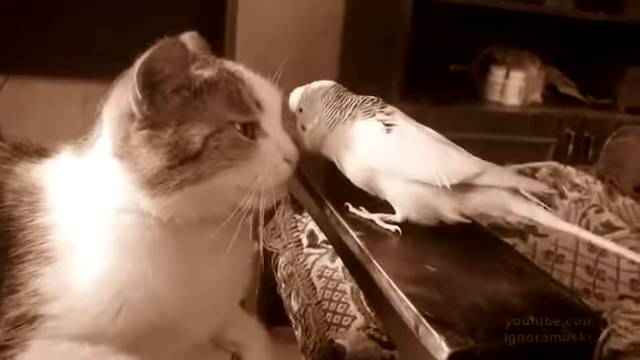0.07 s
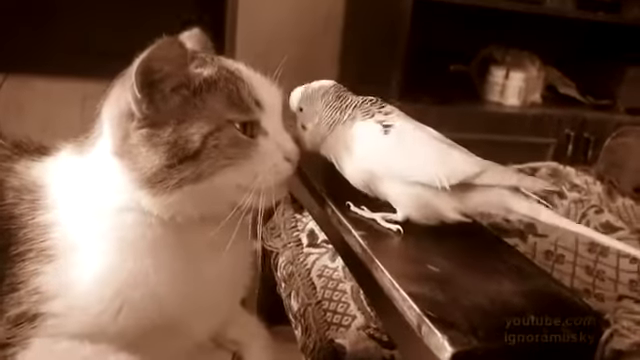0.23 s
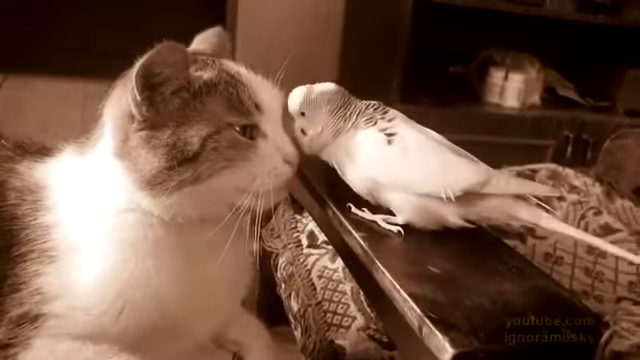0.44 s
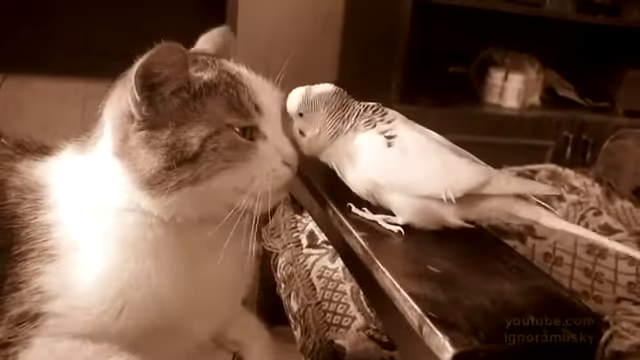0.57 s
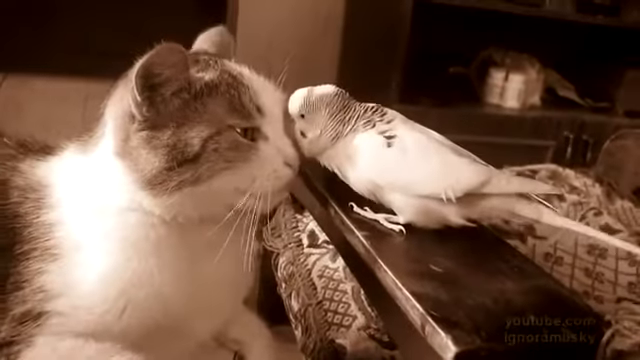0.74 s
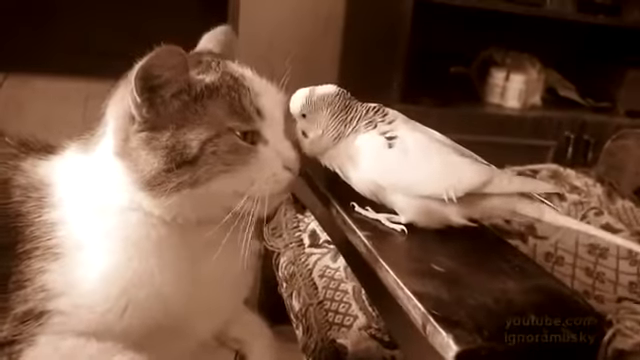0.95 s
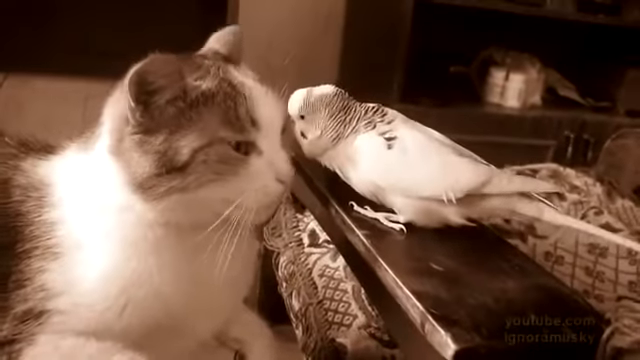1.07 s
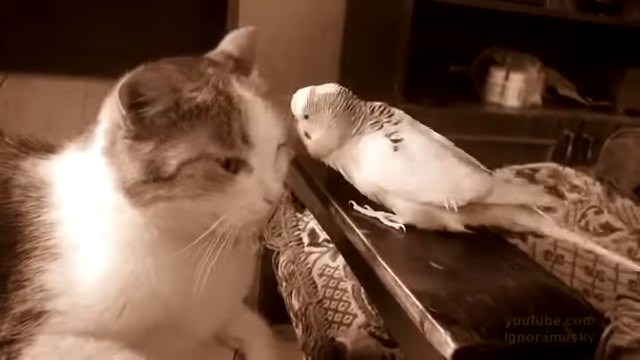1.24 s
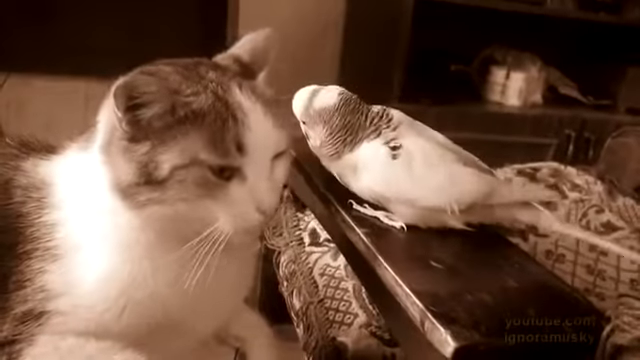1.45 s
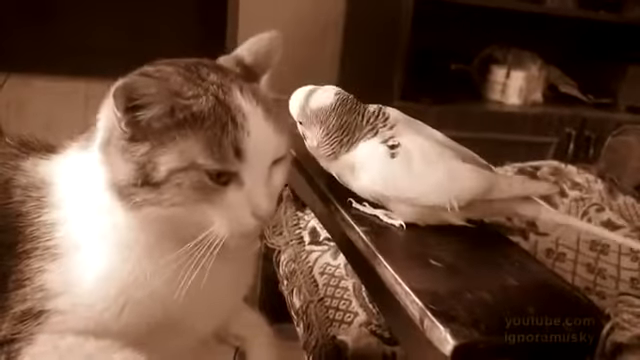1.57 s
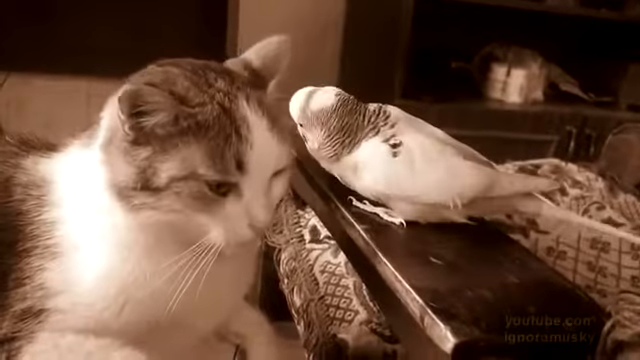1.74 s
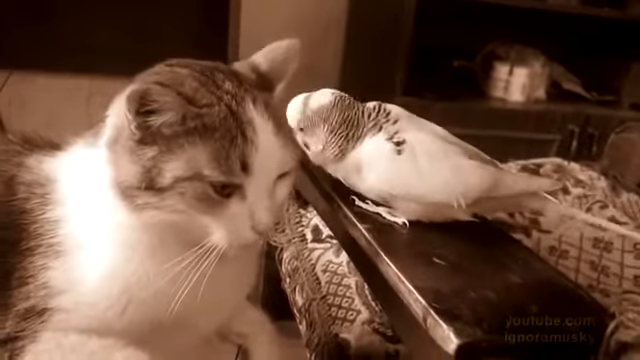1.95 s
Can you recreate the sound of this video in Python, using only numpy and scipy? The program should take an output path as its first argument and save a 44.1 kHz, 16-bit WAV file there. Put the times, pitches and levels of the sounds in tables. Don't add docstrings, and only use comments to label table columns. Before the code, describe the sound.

Small pet parakeet gives a rising two-part call, a rasping squawk, then fast clicking chatter

```python
import sys
import numpy as np
from scipy import signal
from scipy.fft import rfft, irfft, next_fast_len
from scipy.io import wavfile
from scipy.ndimage import uniform_filter1d

SR = 44100
rng = np.random.default_rng(int(sys.argv[2]) if len(sys.argv) > 2 else 0)


def int16_out(signal):
    q = np.round(np.clip(np.atleast_2d(signal).T, -1, 1) * 32767)
    wavfile.write(sys.argv[1], SR, q.astype(np.int16))


def boost(x):
    u = np.asarray(x, float) / 20
    return 10 ** u


N = 88200

# f/Hz, density/dB [per Hz]
AIR_SPECTRUM = [
    (13, -30),
    (24, -5),
    (70, -8.5),
    (264, -0.5),
    (685, -5),
    (976, -6),
    (3300, -10.5),
    (6800, -29.5),
    (15000, -42),
]
AIR_DB, AIR_FLICKER_DB, AIR_FLICKER_HZ = -41.5, 2, 8.9

# f/Hz, bandwidth/Hz, level/dB
HUM_BANDS = [
    (119.3, 3.8, -55),
    (172.8, 20, -58),
    (267.3, 20, -50.5),
    (394.7, 20, -55),
    (466.2, 61, -55),
    (1166.7, 30, -56.5),
    (2798, 61, -53),
]
# f/Hz, level/dB
MOTOR_ORDERS = [
    (459, -51.5),
    (689, -53),
    (920, -58.5),
    (1148, -58.5),
]
WHINE_HZ, WHINE_DB = 7868, -61
FLIPS_PER_S, FIRST_FLIP_S, FLIP_SHARPNESS = 29.97, .024, 14

# t/s, peak level/dB
TICKS = [
    (0.0097, -22),
    (0.0359, -32),
]
# f/Hz, level/dB, decay time T60/s
TICK_MODES = [
    (3130, -5, 0.0066),
    (5860, 2.5, 0.0034),
    (10300, -17, 0.0029),
    (14500, -30, .002),
]
TICK_RISE_S = .00015

ROOM_T60_S, ROOM_DB, WALL_CUT_HZ = 0.36, -24, 5400

# t/s, f/Hz
OPENING_PITCH = [
    (.212, 815),
    (.228, 876),
    (.248, 803),
    (.266, 868),
]
# t/s, f/Hz
RISING_PITCH = [
    (.28, 957),
    (.312, 1009),
    (.346, 1007),
    (.362, 1120),
    (.381, 1185),
    (.388, 1345),
    (.398, 1350),
    (.412, 1390),
]
# t/s, level/dB, odd partials/dB, beak resonance f/Hz, its lift/dB
OPENING_EFFORT = [
    (.213, -39, 2, 3300, -3),
    (.226, -28, -4, 3500, 9),
    (.237, -28.5, -11.5, 3400, 8.5),
    (.257, -40, 11, 3300, 18),
    (.267, -36.5, 0, 3560, 15),
]
# t/s, level/dB, odd partials/dB, beak resonance f/Hz, its lift/dB
RISING_EFFORT = [
    (.274, -40, -5, 4300, 5),
    (.284, -32.5, 1, 5030, 11),
    (.297, -37.5, -9, 5000, 10),
    (.304, -41, -2, 4970, 10),
    (.34, -44.5, -4, 5170, 11.5),
    (.382, -37, 5, 4940, 15),
    (.392, -33, -23, 5400, 4),
    (.415, -39, -34, 5400, 0),
]
# f/Hz, level/dB
THROAT = [
    (900, 1),
    (1900, -3.5),
    (2700, -2.5),
    (4300, -13.5),
    (6000, -14.5),
    (7000, -28.5),
    (9000, -46),
    (12000, -50),
]
CALL_JITTER, CALL_SHIMMER_DB, CALL_BREATH_DB = .006, 1.3, -14
PARTIAL_LAG = .8
BEAK_LIFT_WIDTH_HZ = 750

# t/s, level/dB
SQUAWK_EFFORT = [
    (.39, -60),
    (.408, -25),
    (.421, -25),
    (.431, -6.5),
    (.444, -13.5),
    (.451, -7),
    (.463, -25),
    (.484, -25),
    (.545, -56),
]
# f/Hz, bandwidth/Hz, level/dB
BEAK = [
    (990, 190, -5),
    (1900, 1030, -3),
    (3300, 830, 8),
    (5480, 900, 7.5),
    (7250, 1480, -8.5),
    (12000, 2100, -23.5),
    (1500, 500, -8),
]
LOW_SWELL_DB_PER_S, LOW_FULL_S = 350, .445
SNAPS_PER_S, SNAP_SPREAD_DB, RASP = 2100, 1.5, 0.72
# t/s, peak level/dB
CRACKS = [(.4101, -23), (.4137, -20), (.4162, -20), (.4255, -10), (.4286, -10), (.4303, -8), (.4318, -11),
          (.4351, -7), (.4375, -3), (.4386, -7), (.4399, -3), (.4436, -11), (.4493, -3), (.4516, -7),
          (.4605, -17), (.4654, -20), (.4737, -23), (.4817, -21), (.4832, -23)]
CRACK_LEAD_S, CRACK_RISE_S = .0003, 0.00016

# t/s, length/s, start f/Hz, end f/Hz, level/dB
MURMUR = [(.803, .02, 1000, 1170, -44), (.822, .02, 1050, 900, -45), (.834, .048, 930, 900, -44),
          (.826, .024, 1400, 1380, -46), (.826, .022, 1900, 1820, -44), (.88, .016, 860, 850, -46),
          (.878, .018, 1650, 1750, -46), (.905, .025, 1400, 1330, -47), (.94, .03, 950, 1050, -46),
          (.96, .026, 1430, 1480, -46), (.988, .034, 1200, 900, -40), (1.014, .012, 1650, 1550, -39),
          (1.025, .019, 2300, 1450, -33), (1.041, .02, 1400, 930, -40), (1.043, .008, 2600, 2300, -45)]
# t/s, length/s, start f/Hz, end f/Hz, level/dB
SLIDING_NOTES = [(1.261, 0.011, 1900, 2240, -44.5), (1.335, 0.0084, 2780, 2800, -43),
                 (1.36, 0.011, 1960, 2700, -42.5), (1.386, 0.015, 1900, 2300, -45),
                 (1.418, 0.015, 1820, 2520, -40), (1.42, 0.0048, 2900, 2580, -45),
                 (1.45, 0.0078, 1570, 2400, -41), (1.477, 0.0091, 1900, 2300, -47),
                 (1.48, 0.01, 2690, 2800, -45), (1.641, 0.0056, 3280, 3000, -45),
                 (1.744, 0.012, 1900, 2480, -41.5), (1.746, .007, 2700, 3120, -49),
                 (1.769, 0.0087, 1500, 2320, -39), (1.906, 0.013, 1366, 2060, -38.5),
                 (1.908, 0.0071, 2510, 2730, -36), (1.943, .007, 1500, 1900, -45)]
NOTE_OCTAVE_DB, NOTE_EDGE = -5, .3
NOTE_WAVER_DB, NOTE_JITTER = 2.6, .015

# t/s, peak level/dB, f/Hz, swell time/ms, snap level/dB
PIPS = [(1.098, -33, 3080, 0.5, -14), (1.1282, -27, 3170, 0.27, -10), (1.1636, -19.5, 3460, 0.2, -4),
        (1.194, -18.5, 3550, 0.26, -4), (1.2251, -17, 3160, 0.38, -7), (1.254, -18, 3180, 0.36, -15),
        (1.2843, -16, 2910, 0.44, -16), (1.3154, -24.5, 3300, 0.32, -13), (1.3471, -23, 3560, 0.27, -20),
        (1.3776, -23, 3020, 0.14, -13), (1.409, -18, 2940, 0.34, -14), (1.44, -21.5, 2650, 0.5, -6.5),
        (1.4716, -18, 2560, 0.58, -9), (1.504, -18.5, 2710, 0.36, -8), (1.539, -28, 2700, 0.23, -5),
        (1.6066, -33, 2840, 0.36, -3), (1.6306, -25.5, 3270, 0.23, -2), (1.6679, -19.5, 3030, 0.23, -16),
        (1.701, -22, 2560, 0.49, -6), (1.733, -15, 2700, 0.47, -22), (1.7656, -16.5, 2710, 0.44, -19),
        (1.7985, -19, 2570, 0.51, -8), (1.8322, -22.5, 2710, 0.4, -14), (1.8661, -17.5, 2740, 0.45, -16),
        (1.9009, -17.5, 2610, 0.34, -9), (1.9342, -18.5, 2520, 0.24, -8), (1.9668, -23.5, 2910, 0.32, 8)]
PIP_RISE_HZ_PER_MS = 60
SNAP_MULTIPLE, SNAP_AT_MS, SNAP_WIDTH_MS = 1.36, .5, .2
CLICK_HZ, CLICK_DB, CLICK_WIDTH_MS = 13000, -31, 0.09

GAIN_KNEE_DB, GAIN_SLOPE, GAIN_MOST_DB = -29, 0.88, 6
GAIN_BACK_S, GAIN_LISTEN_S = 0.21, 0.045
CUTOFF_HZ = 15450


def rms_one(x):
    return x / np.sqrt(np.mean(x ** 2) + 1e-20)


def at_hz(points, hz):
    table_hz, table_db = np.array(points)[:, 0], np.array(points)[:, 1]
    return np.interp(np.log(hz), np.log(table_hz), table_db)


def drift(rate_hz):
    r = np.exp(-2 * np.pi * rate_hz / SR)
    white = rng.standard_normal(N + SR)
    return rms_one(signal.lfilter([1], [1, -2 * r, r * r], white)[SR:])


def resonate(x, hz, width_hz):
    r = np.exp(-np.pi * width_hz / SR)
    zeros = [(1 - r * r) / 2, 0, (r * r - 1) / 2]
    return signal.lfilter(zeros, [1, -2 * r * np.cos(2 * np.pi * hz / SR), r * r], x)


def butter(x, hz, kind):
    return signal.sosfilt(signal.butter(2, hz, kind, fs=SR, output="sos"), x)


def curve(rows):
    s, *columns = np.transpose(rows)
    t = np.arange(N) / SR
    gate = np.clip(np.minimum(t - s[0], s[-1] - t) / 0.005, 0, 1)
    return [gate] + [np.interp(t, s, c) for c in columns]


def add(out, s, x):
    i = int(s * SR)
    out[i:i + len(x)] += x[:N - i]


def air():
    out = 0
    edges = 18 * 2 ** np.arange(0, 10.1, .5)
    white = rng.standard_normal((2, N + SR))
    for k, (low, high) in enumerate(zip(edges, edges[1:])):
        band = butter(white[k % 2], [low, high], "band")[SR:]
        level_db = at_hz(AIR_SPECTRUM, np.sqrt(low * high))
        out = out + boost(level_db + AIR_FLICKER_DB * drift(AIR_FLICKER_HZ)) * band
    return boost(AIR_DB) * rms_one(out)


def hum():
    t = np.arange(N) / SR
    out = np.zeros(N)
    for hz, db in MOTOR_ORDERS:
        out += np.sqrt(2) * boost(db) * np.sin(2 * np.pi * (hz * t + rng.random()))
    flips = np.tanh(FLIP_SHARPNESS * np.sin(np.pi * FLIPS_PER_S * (t - FIRST_FLIP_S)))
    out += np.sqrt(2) * boost(WHINE_DB) * flips * np.sin(2 * np.pi * WHINE_HZ * t)
    for hz, width_hz, db in HUM_BANDS:
        white = rng.standard_normal(N + SR)
        wavering = resonate(resonate(white, hz, width_hz), hz, width_hz)[SR:]
        out += boost(db) * rms_one(wavering)
    return out


def ticks():
    out, t = np.zeros(N), np.arange(800) / SR
    rise = np.minimum(t / TICK_RISE_S, 1)
    for s, db in TICKS:
        ring = sum(boost(db + d - 60 * t / t60) * np.sin(2 * np.pi * hz * t) for hz, d, t60 in TICK_MODES)
        add(out, s, -rise * ring)
    return out


def room(x):
    size = next_fast_len(N + SR)
    w = 2 * np.pi * np.arange(size // 2 + 1) / size
    wall = 1 / (1 + 1j * w * SR / (2 * np.pi * WALL_CUT_HZ))
    tail = 0
    for k, lag in enumerate(rng.uniform(0.0021, .022, 10)):
        loop = boost(-60 * lag / ROOM_T60_S) * wall * np.exp(-1j * w * lag * SR)
        tail = tail + (-1) ** k * loop / (1 - loop)
    return irfft(rfft(x, size) * tail, size)[:N]


def call():
    _, hz = curve(OPENING_PITCH + RISING_PITCH)
    gate, db, odd_db, beak_hz, lift_db = curve(OPENING_EFFORT + RISING_EFFORT)
    phase = 2 * np.pi * np.cumsum(hz * (1 + CALL_JITTER * drift(120))) / SR
    tone, power = 0, 0
    for k in range(1, 11):
        beak_db = lift_db * np.exp(-((k * hz - beak_hz) / BEAK_LIFT_WIDTH_HZ) ** 2)
        gain = boost(at_hz(THROAT, k * hz) + odd_db * (k % 2) + beak_db)
        shimmer = boost(CALL_SHIMMER_DB * np.sqrt(k / 2) * drift(130))
        tone = tone - gain * shimmer * np.cos(k * phase - PARTIAL_LAG * k * k / 10)
        power = power + gain ** 2 / 2
    puffs = rng.standard_normal(N) * (1 - np.cos(phase))
    breath = rms_one(resonate(resonate(puffs, 3300, 3000), 3300, 3000))
    return gate * boost(db) * (tone / np.sqrt(power) + boost(CALL_BREATH_DB) * breath)


def squawk():
    gate, db = curve(SQUAWK_EFFORT)
    extra = np.minimum(rng.exponential(1, N), 2.2)
    snaps = (rng.random(N) < SNAPS_PER_S / SR) * -boost(SNAP_SPREAD_DB * extra)
    source = rms_one(snaps) + RASP * rng.standard_normal(N) * boost(3.7 * drift(420))
    opening_db = LOW_SWELL_DB_PER_S * np.clip(np.arange(N) / SR - LOW_FULL_S, -.05, 0)
    voiced = 0
    for k, (hz, width_hz, d) in enumerate(BEAK):
        wide = 1.55 * width_hz
        gain = boost(d + opening_db * (hz < 2600))
        voiced = voiced + gain * (-1) ** k * resonate(resonate(source, hz, wide), hz, wide)
    running_rms = np.sqrt(uniform_filter1d(voiced ** 2, size=130) + 1e-12)
    return gate * boost(db) * voiced / running_rms


def cracks():
    out, t = np.zeros(N), np.arange(90) / SR
    colours_db = 4.0 * rng.standard_normal((len(CRACKS), 3))
    for (s, db), colour_db in zip(CRACKS, colours_db):
        ring = 0
        for (hz, width_hz, d), c in zip(BEAK[1:4], colour_db):
            ring = ring + boost(d + c) * np.exp(-np.pi * width_hz * 1.3 * t) * np.sin(2 * np.pi * hz * t)
        ring = ring * np.minimum(t / CRACK_RISE_S, 1)
        add(out, s - CRACK_LEAD_S, -boost(db) * ring / np.abs(ring).max())
    return butter(out, [1400, 9000], "band")


def notes():
    out, jitter = np.zeros(N), 1 + NOTE_JITTER * drift(200)
    for s, length, from_hz, to_hz, db in MURMUR + SLIDING_NOTES:
        u = np.linspace(0, 1, int(length * SR))
        glide_hz = from_hz + (to_hz - from_hz) * u
        phase = 2 * np.pi * np.cumsum(glide_hz * jitter[int(s * SR):][:len(u)]) / SR
        shape = np.clip(np.minimum(u, 1 - u) / NOTE_EDGE, 0, 1)
        octave = boost(NOTE_OCTAVE_DB - 18 * (from_hz > 1300))
        add(out, s, np.sqrt(2) * boost(db) * shape * (np.sin(phase) + octave * np.sin(2 * phase)))
    return out * boost(NOTE_WAVER_DB * drift(160))


def pips():
    out, ms = np.zeros(N), np.arange(600) * 1000 / SR
    late = ms - SNAP_AT_MS
    click = np.exp(-(late / CLICK_WIDTH_MS) ** 2 / 2) * np.cos(2 * np.pi * CLICK_HZ * late / 1000)
    turns = rng.uniform(0, 2 * np.pi, (len(PIPS), 2))
    for (s, db, hz, swell_ms, snap_db), turn in zip(PIPS, turns):
        snap_phase = 2 * np.pi * SNAP_MULTIPLE * hz * late / 1000 + turn[1]
        snap = np.exp(-(late / SNAP_WIDTH_MS) ** 2 / 2) * np.cos(snap_phase) + boost(CLICK_DB) * click
        roundness = np.clip(5.0 * swell_ms + .5, 1.2, 3)
        u = ms / max(swell_ms, .1) / roundness
        swell = (u * np.exp(1 - u)) ** roundness
        pitch = hz + PIP_RISE_HZ_PER_MS * (ms - 2 * swell_ms)
        tone = swell * np.sin(2 * np.pi * np.cumsum(pitch) / SR + turn[0])
        add(out, s, boost(db) * (tone + boost(snap_db) * snap))
    return butter(out, 1400, "high")


def scene():
    bird = ticks() + call() + squawk() + cracks() + notes() + pips()
    return (bird + boost(ROOM_DB) * room(bird) + air() + hum())[None]


def band_limit(x):
    return signal.sosfilt(signal.butter(12, 15100, fs=SR, output="sos"), x)


def record(dry):
    t = np.arange(N) / SR
    r = np.exp(-1 / (GAIN_LISTEN_S * SR))
    level_db = 10 * np.log10(signal.lfilter([1 - r], [1, -r], dry[0] ** 2) + 1e-12)
    want_db = GAIN_SLOPE * np.maximum(level_db - GAIN_KNEE_DB, 1e-6)
    held_db = np.exp(np.maximum.accumulate(np.log(want_db) + t / GAIN_BACK_S) - t / GAIN_BACK_S)
    duck_db = uniform_filter1d(np.minimum(held_db, GAIN_MOST_DB), size=400)
    top_cut = signal.cheby2(12, 60, CUTOFF_HZ, fs=SR, output="sos")
    mix = signal.sosfilt(top_cut, dry * boost(-duck_db))
    return band_limit(mix)


dry = scene()
out = record(dry)
int16_out(out)
```